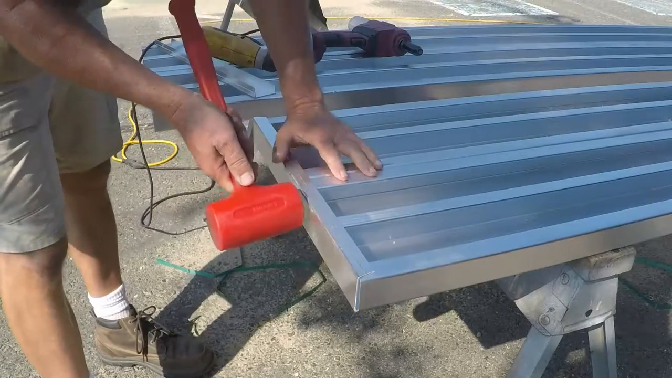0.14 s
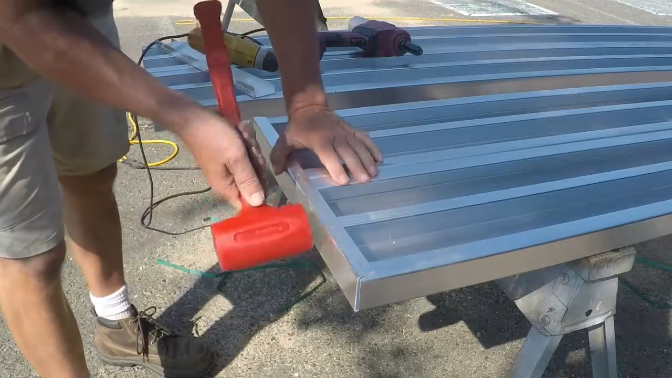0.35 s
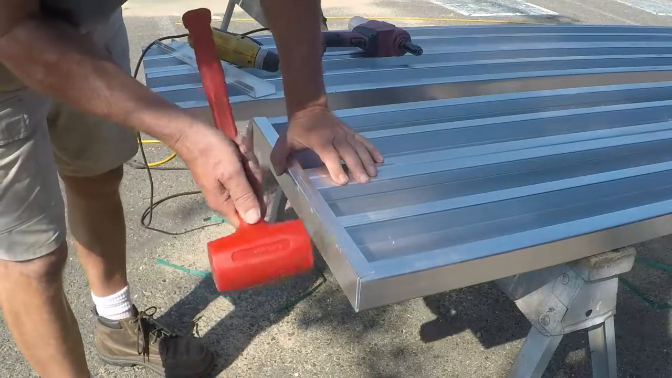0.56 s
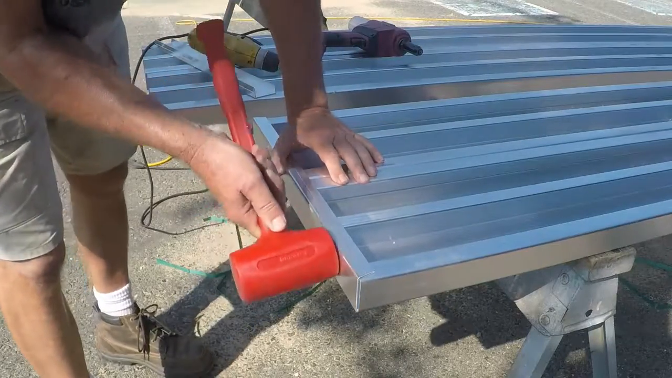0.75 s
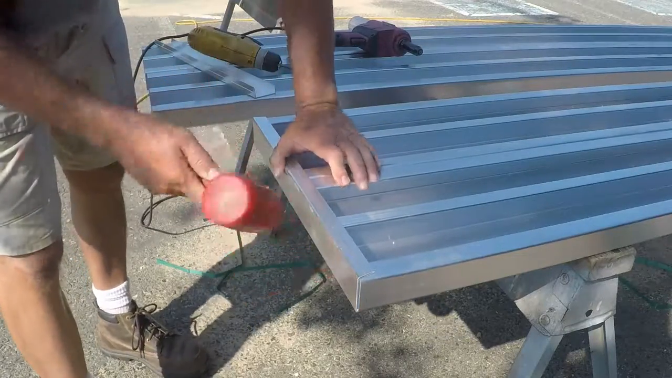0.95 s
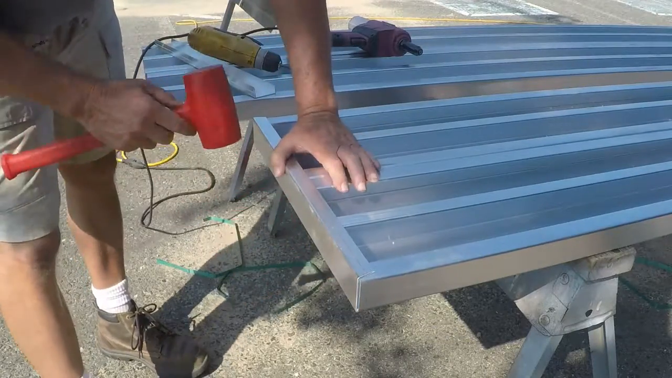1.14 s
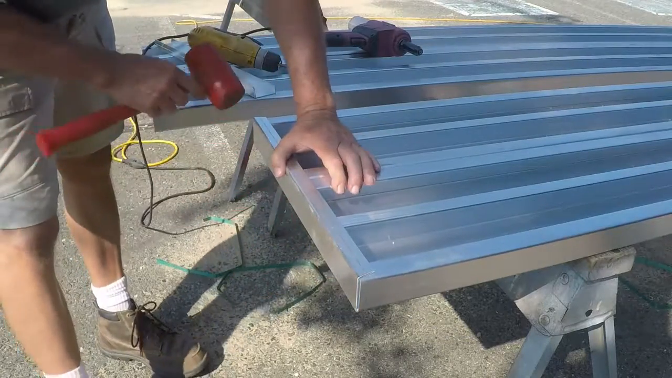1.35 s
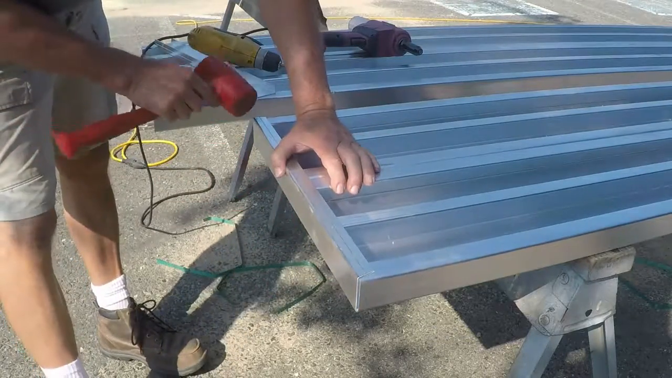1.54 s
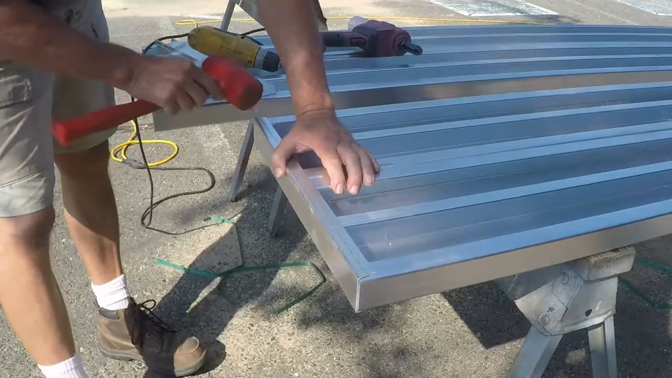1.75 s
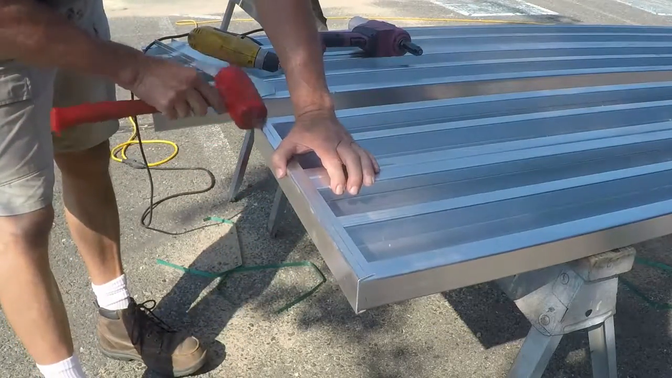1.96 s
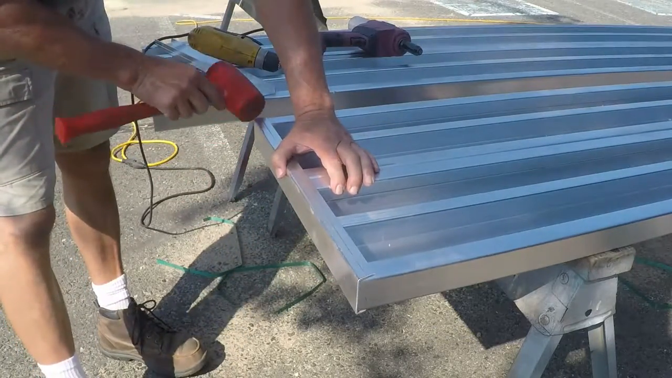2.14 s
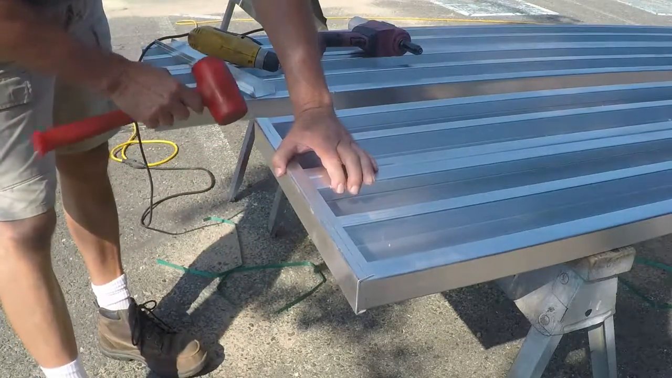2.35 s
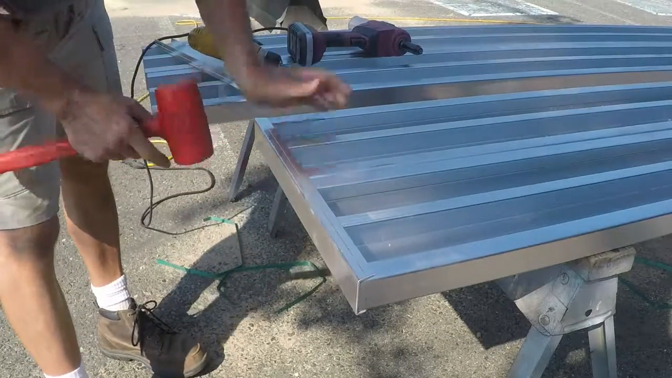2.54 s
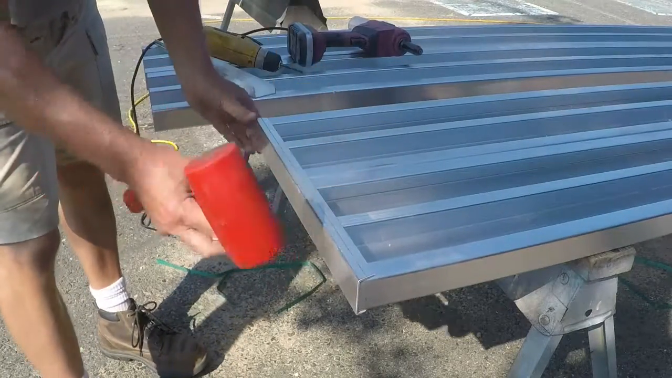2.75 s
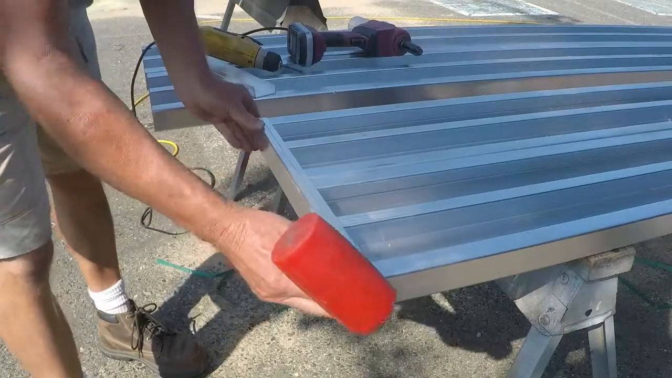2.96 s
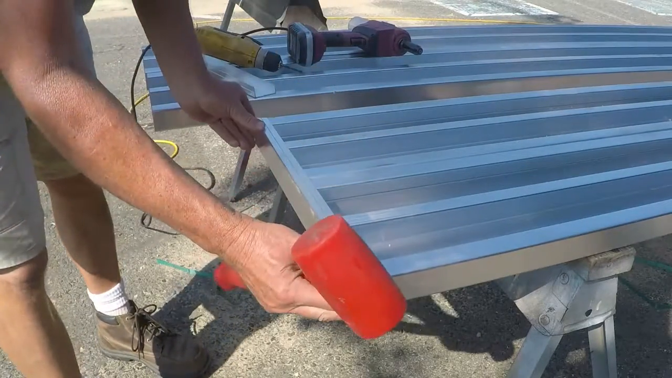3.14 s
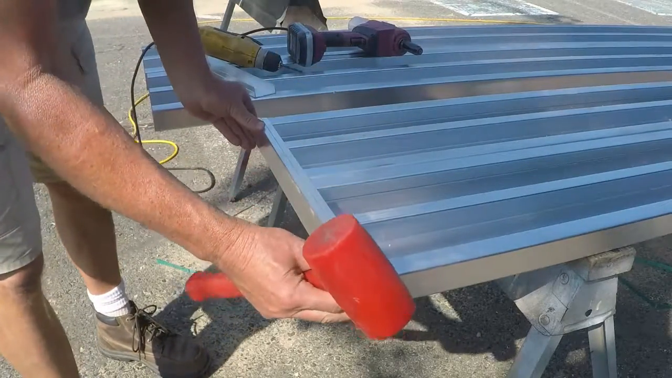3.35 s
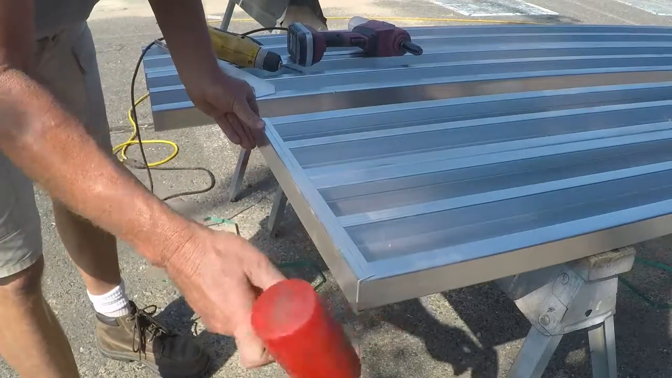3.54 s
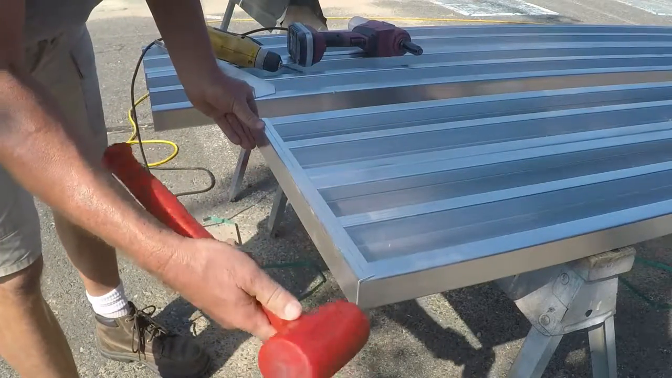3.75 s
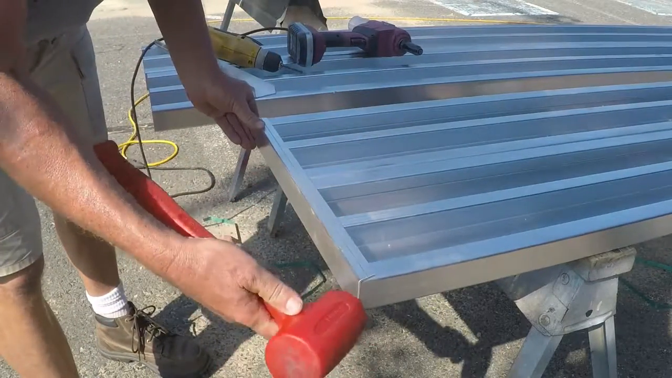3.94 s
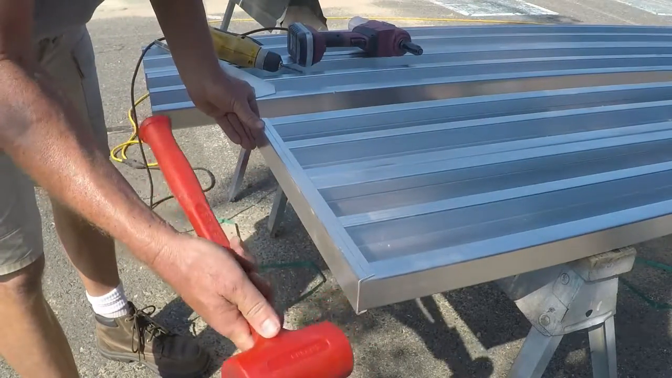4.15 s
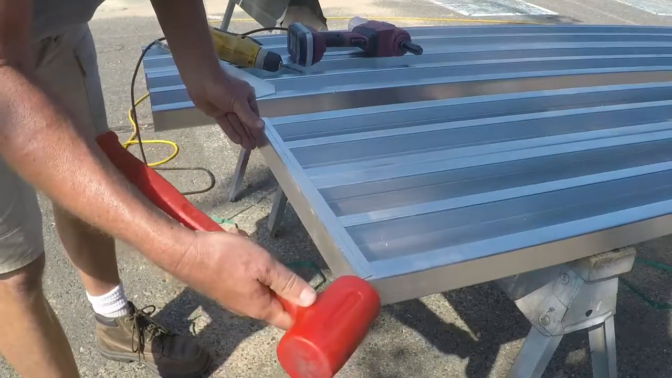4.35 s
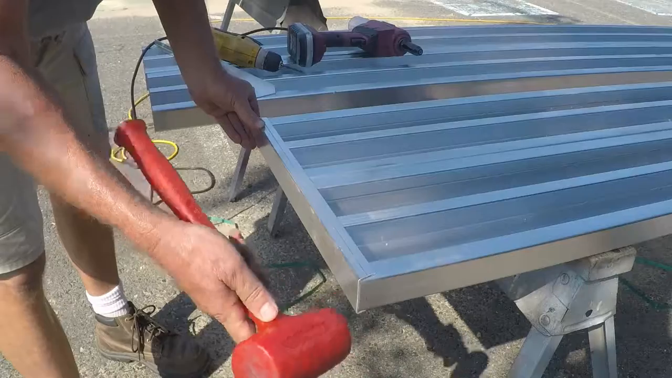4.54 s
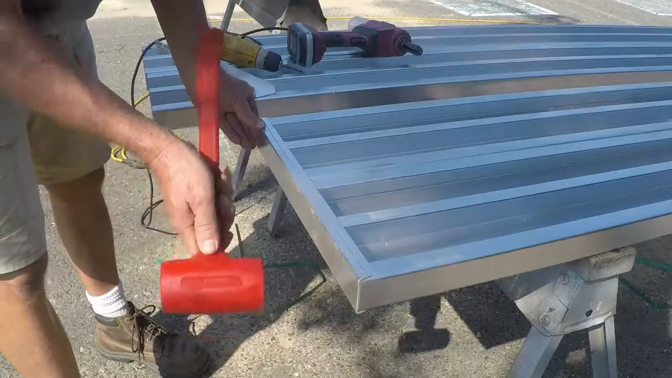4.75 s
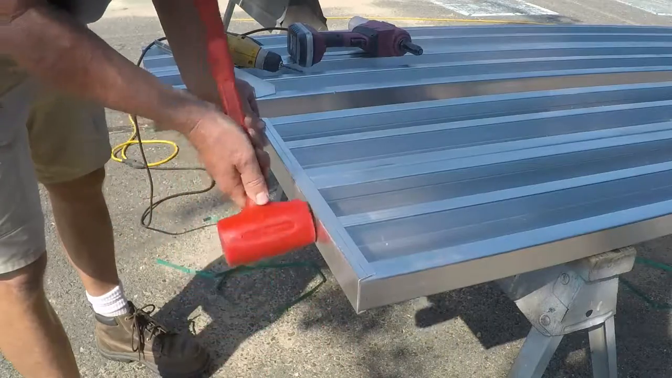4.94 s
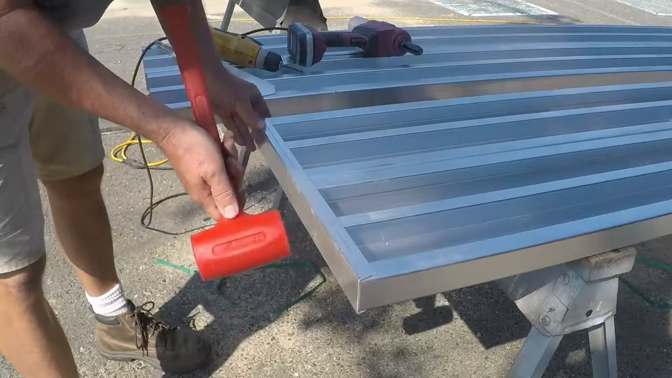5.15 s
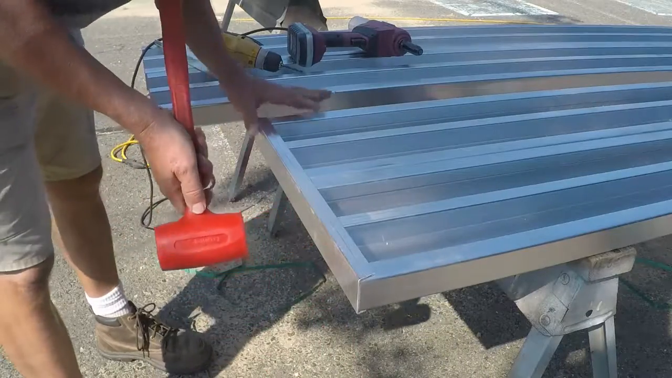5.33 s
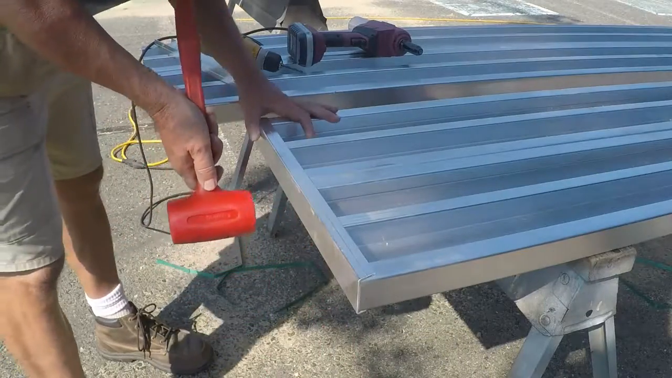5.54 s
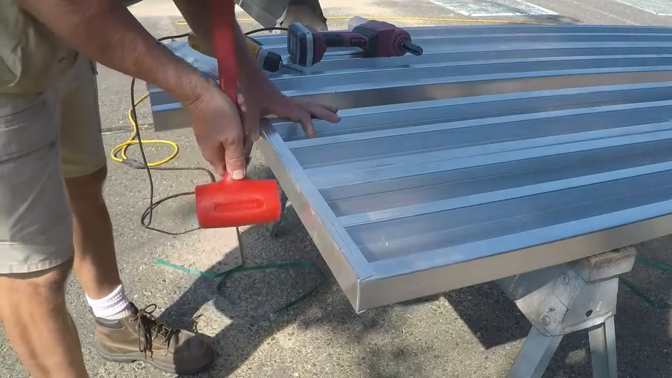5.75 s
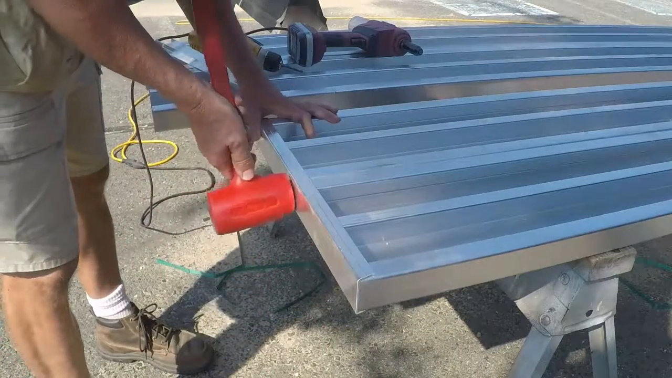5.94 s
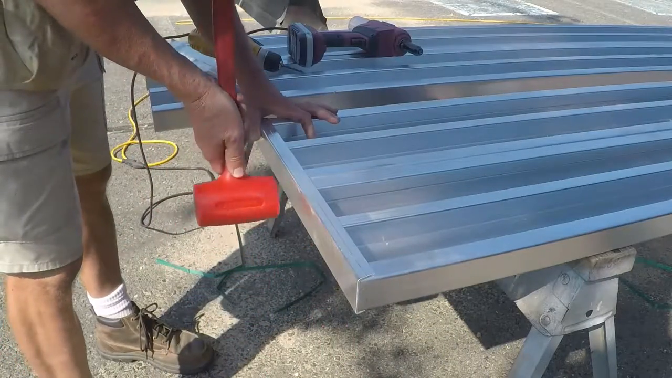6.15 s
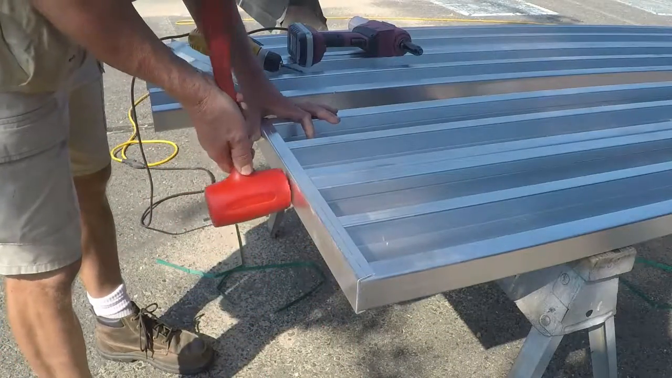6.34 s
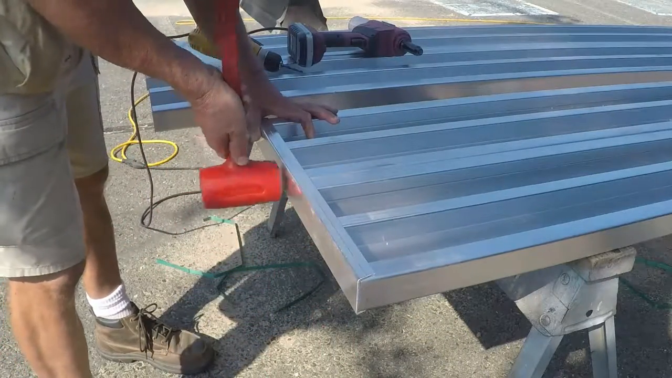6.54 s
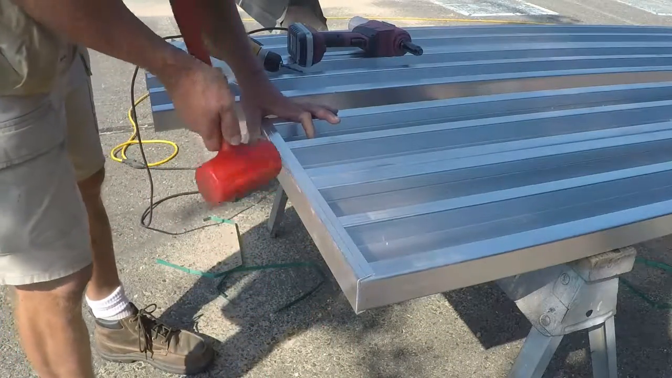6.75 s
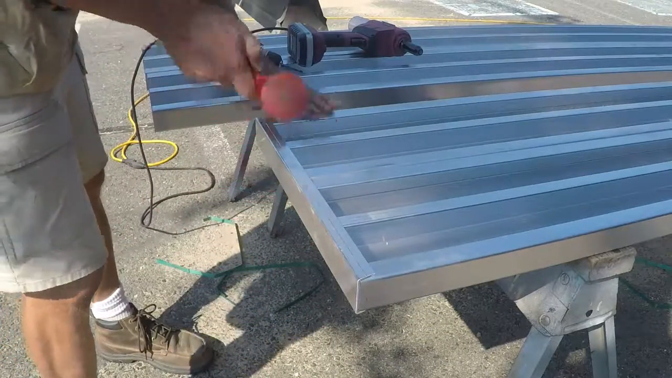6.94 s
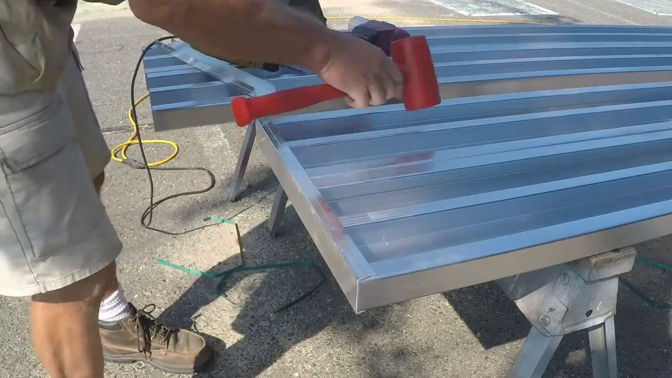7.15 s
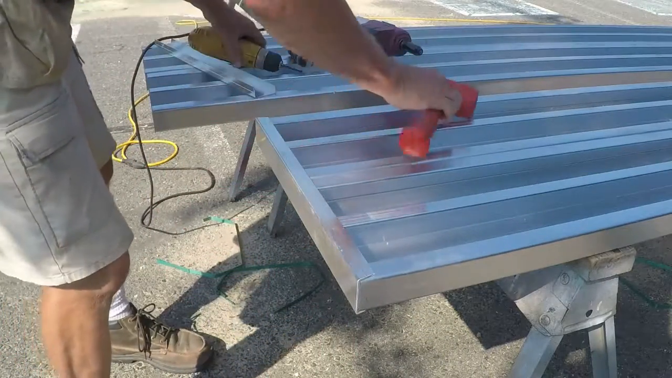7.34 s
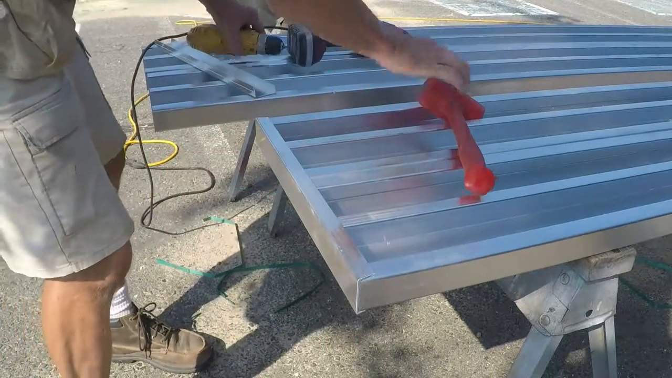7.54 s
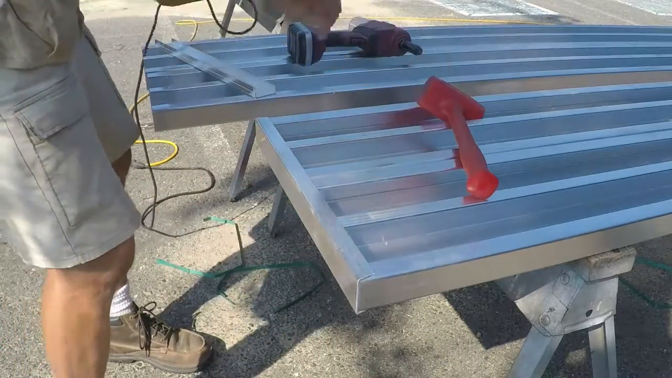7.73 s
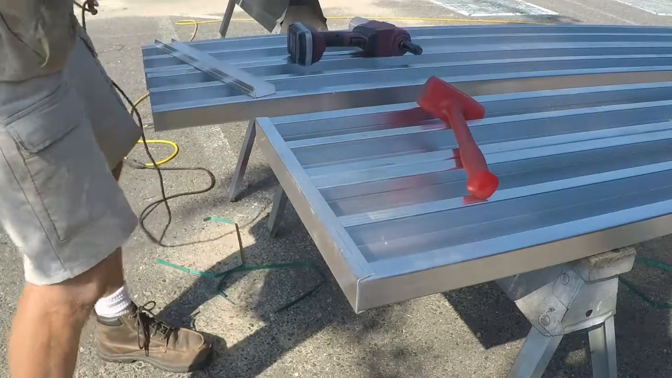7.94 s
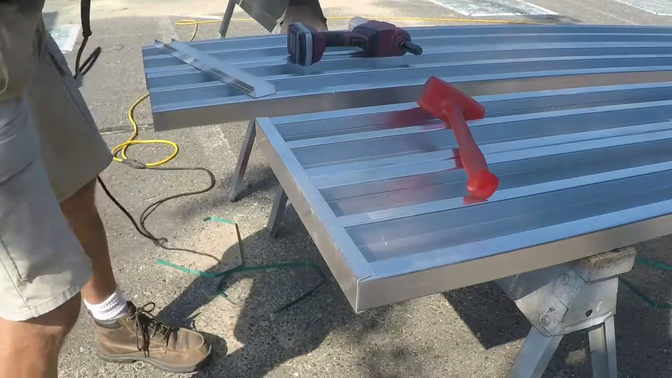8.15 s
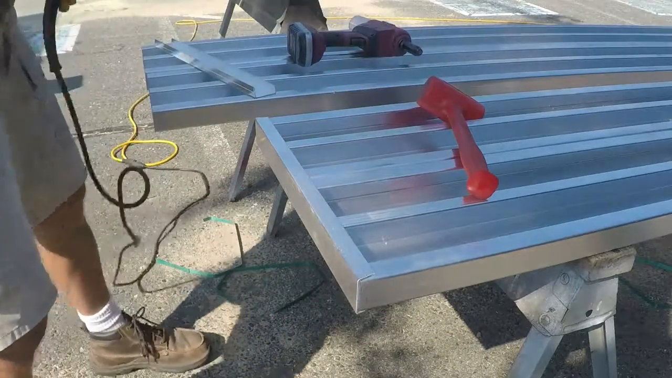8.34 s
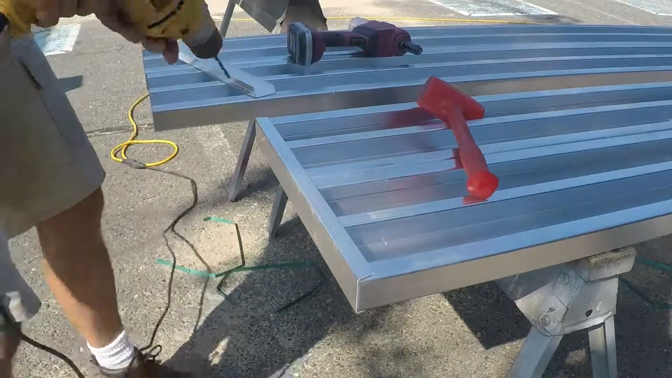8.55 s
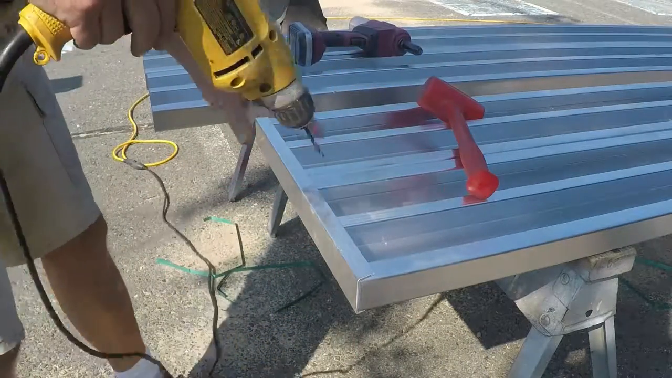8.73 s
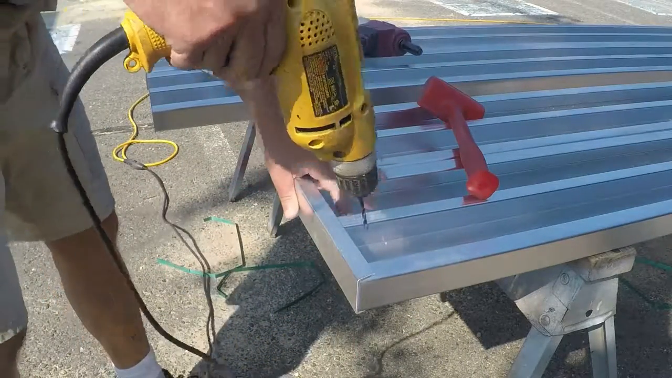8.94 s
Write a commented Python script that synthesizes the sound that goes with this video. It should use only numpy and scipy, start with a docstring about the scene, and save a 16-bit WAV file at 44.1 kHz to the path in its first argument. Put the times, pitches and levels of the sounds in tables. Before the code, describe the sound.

Outdoors, close to hollow aluminium planks resting on sawhorses, with low lumpy wind rumble and faint far hiss throughout. A mallet blow lands at once, followed by sharper, louder cracks at 0.4 and 0.7 s; each has a gritty shot-filled impact, a small low thump, a clangy midrange ring fading within half a second, and rattling of loose metal. From 1.2 to 3.5 s there are only soft brushes and muted knocks, at about 1.6, 1.9 and 2.2 s. A moderate knock at 3.8 leads to strong blows at 4.3, 4.95, 5.85 (the loudest crack), 6.2 and 6.6 s, with light metallic touches between. The mallet is set down on the metal with dull hollow clunks at 7.3 and 7.5 s. Faint scuffs follow; around 8.3 s a small steel part jingles quickly and brightly, then slight touches and quiet air until 9 s.

```python
"""Mallet blows on hollow metal planks

A shot-filled mallet knocks an aluminium end cap onto hollow aluminium planks lying on sawhorses, out of doors.
Each blow sums a noise crack, a two-mode thump of the sawhorses and a dense ring of decaying sheet modes.
Random tiny contacts make the loose planks chatter on, and soft noise touches brush the metal between blows.
Near the end a small steel part on a tool jingles; shaped noise gives wind rumble and a far hiss."""
import sys
import numpy as np
from scipy import signal
from scipy.fft import rfft, irfft, next_fast_len
from scipy.io import wavfile
from scipy.ndimage import uniform_filter1d, map_coordinates

SR = 44100
rng = np.random.default_rng(int(sys.argv[2]) if len(sys.argv) > 2 else 0)


def to_wav(sig):
    """Store sig (one row per channel, or 1-D mono) as 16-bit WAV at the path in sys.argv[1].

    Samples outside -1..1 are clipped; the rate is SR.
    """
    pcm = np.clip(np.atleast_2d(sig), -1, 1) * 32767
    pcm = np.round(pcm).astype(np.int16)
    wavfile.write(sys.argv[1], SR, pcm.T)  # frames by channels


N = 396459

# Mallet blows and knocks: start_s, crack_peak_db, ring_db (relative), thump_db (relative),
# ring_tilt_db_per_octave, decay_factor, ring_build_s, crack_pitch_hz, crack_brightness_db (relative),
# spot_hz (mode favoured by the struck spot), spot_boost_db, then the chatter of the loose planks:
# chatter_db, chatter_build_s, chatter_hold_s, chatter_fall_db_per_s, body_share_db
BLOW_EVENTS = [(0.0034, -19, -30, -46, 1.5, 1.48, 0.0096, 3100, -5, 900, 10.5, -35, 0.0061, 0.0027, 166, -4),
               (0.4205, -8.5, -28, -37.5, 0, 1.31, 0.013, 4200, -1, 366, 2, -31.5, 0.009, 0.016, 122, -10),
               (0.7263, -12.5, -28.5, -39, -4, 1.28, 0.0078, 4500, -2, 915, 1.5, -33, 0.0088, 0.016, 81, -6),
               (1.6427, -31.5, -32.5, -34.5, -3.5, 1.65, 0.0085, 3440, 1.5, 660, -3, -40.5, 0.022, .15, 185, -10.5),
               (1.912, -27.5, -28.5, -35.5, -3.5, 1.14, 0.0077, 890, 0.5, 660, 2, -39.5, 0.021, 0.16, 173, -6.5),
               (2.2188, -30.5, -30.5, -36.5, -3, 1.37, 0.0049, 1200, 3, 370, -2, -41.5, 0.007, .19, 121, -11),
               (3.8323, -23.5, -26.5, -34.5, -1.5, 1.3, 0.015, 2180, 1, 327, 8, -36, 0.0047, 0.16, 67, -7.5),
               (4.2867, -11, -24, -41, 1.5, 1.19, 0.0071, 3250, 2.5, 660, 0.5, -33, 0.0054, 0.0084, 68, -4),
               (4.9465, -7.5, -28.5, -42, 2.5, 1.44, 0.015, 4530, 3, 212, 8, -34, 0.016, 0.028, 118, -2),
               (5.841, -3.5, -32, -44.5, 1.4, 1.34, 0.019, 5040, 4.5, 388, 9, -33, 0.011, 0.018, 155, -8.5),
               (6.2336, -13.5, -31, -44.5, 0.5, 1.18, 0.027, 2310, -0.5, 395, 8, -35, .008, 0.015, 162, -3),
               (6.6049, -6.5, -31, -43, 2, 1.35, 0.015, 3100, 0, 1340, 6, -32, .008, 0.014, 143, -3),
               (7.3302, -31.5, -31, -42.5, -6.5, 0.76, 0.0022, 1190, 2, 210, 0, -37.5, 0.022, 0.067, 98, 0.5),
               (7.534, -25.5, -27.5, -32, -2, 1.22, 0.0017, 4360, 0, 660, 4.5, -38.5, 0.013, 0.14, 73, -2),
               (8.279, -48, -46, -62, -4.5, 1.47, 0.017, 2300, -1, 318, 19, -53.5, 0.011, .03, 84, 3)]
# Light touches and drags on the metal: start_s, touch_db (relative), then the chatter after each:
# chatter_db, chatter_hold_s, chatter_fall_db_per_s
TOUCH_EVENTS = [(0.205, -48, -55, .02, 200), (0.2623, -46, -57.5, .015, 110), (1.191, -44, -59, .01, 77),
                (1.421, -52, -62.5, .07, 202), (2.178, -41, -47.5, .03, 100),
                (2.504, -38.5, -44.5, .03, 150), (2.616, -60, -56.5, .03, 46),
                (2.782, -38.5, -58.5, .015, 98), (3.053, -45, -63, .02, 88), (3.426, -47, -66, .01, 60),
                (4.205, -49, -48, .015, 117), (4.572, -40, -47, .01, 132), (4.74, -55, -59.5, .03, 80),
                (4.8184, -49, -63.5, .015, 59.5), (5.229, -40, -63, .015, 39), (5.507, -57, -69, .1, 30),
                (5.78, -42, -71, .015, 299), (6.471, -39.5, -61, .035, 150),
                (7.143, -45.5, -70.5, .015, 50.5), (7.855, -58, -54, .1, 33), (7.996, -40, -54.5, .015, 40),
                (8.18, -50, -58, .01, 200), (8.501, -46, -63.5, .075, 219.5),
                (8.752, -47, -71.5, .008, 400)]
# Dense plank modes between the clusters: frequency_hz, density_db (per Hz)
SHEET_SPECTRUM = [(53, -40.5), (90, -3), (398, 1), (667, -5), (902, -4), (1760, -13), (2280, -6.5),
                  (2890, -14.5), (4700, -16), (5100, -28.5), (6000, -26), (6500, -32), (9500, -42),
                  (15500, -56.5)]


def amp(db):
    """Level: decibels to an amplitude ratio."""
    return 10 ** (np.asarray(db) / 20)


def unit(x):
    """Normalisation: scales a signal to rms 1."""
    return x / np.sqrt(np.mean(x ** 2) + 1e-20)


def along(points, hz):
    """Spectral envelope: interpolates (frequency, value) points on a log axis."""
    f, v = np.transpose(points)
    return np.interp(np.log(hz + 1), np.log(f + 1), v)


def wobble(rate):
    """Slow fluctuation: a smooth random curve with rate knots a second."""
    knots = rng.standard_normal(int(N * rate / SR) + 4)
    return map_coordinates(knots, [np.arange(N) * rate / SR])


def filtered(x, response):
    """Linear filtering: multiplies the spectrum of x by a response of frequency."""
    m = next_fast_len(len(x) + 4096)
    return irfft(rfft(x, m) * response(np.fft.rfftfreq(m, 1 / SR)), m)[:len(x)]


def add(out, s, sound):
    """Superposition: mixes a sound in at time s."""
    part = out[round(s * SR):][:len(sound)]
    part += sound[:len(part)]


def mallet():
    """Impact excitation: each blow gives a crack, a ring and a low damped thump of the sawhorses."""
    out, t = np.zeros(N), np.arange(SR // 2) / SR
    for blow in BLOW_EVENTS:
        s, crack_db, ring_db, thump_db, tilt_db, slow, rise, pitch_hz, bright_db, spot_hz, spot_db, *_ = blow
        blunt = 1 + amp(-.6 * (crack_db + 22.5))  # weak blows land blunter
        add(out, max(s - .002, 0), amp(crack_db) * crack(pitch_hz, bright_db, blunt))
        add(out, s, amp(ring_db - 3.5) * ring(tilt_db, slow, rise, spot_hz, spot_db))
        # the legs stand a little differently each time
        sway_hz, knock_hz = np.array([72, 175]) * rng.normal(1, 0.1, 2)
        sway = np.sin(2 * np.pi * sway_hz * t)
        knock = 0.97 * np.sin(2 * np.pi * knock_hz * t) * amp(-60 * t / .5)
        envelope = amp(thump_db - 60 * t / 0.66) * (1 - np.exp(-t / 0.0021))
        add(out, s, envelope * (sway + knock))
    return out


def crack(pitch_hz, bright_db, blunt):
    """Contact noise: the face touches, the shot inside lands 2 ms later, and the ground echoes it."""
    # Crack colour: frequency_hz, density_db (per Hz)
    crack_spectrum = [(150, -23), (700, -6), (2000, -6.5), (4500, -6), (8000, -14.5), (12000, -28.5),
                      (16000, -36)]
    t = np.arange(SR // 8) / SR

    def burst(s, t60):
        onset = 1 - np.exp(-np.maximum(t - s, 0) / (0.00042 * blunt))
        return onset * amp(-60 * np.abs(t - s) / (t60 * blunt))

    def colour(f):
        peak = 1 + 0.91 / (1 + ((f - pitch_hz) / 700) ** 2)
        return amp(along(crack_spectrum, f) + bright_db * np.log2(1 + f / 4000) * 2) * peak

    def clank(f):
        # the mode clusters, without the sheet response, colour the crack
        return colour(f) * plank(f, 9.2) / amp(along(SHEET_SPECTRUM, f))

    face, shot = 0.23 * burst(0, 0.0068), burst(.0021, 0.018)
    echo, tail = 0.24 * burst(0.0092, 0.0078), 0.14 * burst(0.0016, 0.13)
    sound = (face + shot + echo + tail) * filtered(rng.standard_normal(len(t)), clank)
    return sound / np.abs(sound).max()


def ring(tilt_db, slow, rise, spot_hz, spot_db):
    """High modal density: noise dying at its own speed in each band, plus the clear damped modes."""
    # Decay of the dense modes at decay factor 1: frequency_hz, t60_s
    dense_decay = [(100, 1), (260, 0.78), (700, 0.58), (1840, 0.78), (4850, .3), (12800, 0.147)]
    # Clear modes of cap and plank, decay at factor 1: frequency_hz, level_db (relative), t60_s
    clear_modes = [(206.8, -4, 0.68), (241.5, -0.5, 0.55), (292, -9.5, 1), (326.2, -6.5, 0.66),
                   (377.6, -13, 0.53), (401.5, -7, 0.98), (609, -6.5, 0.69), (648.4, 2, 0.54),
                   (683, -3.5, 0.87), (893, -6.5, 0.24), (895, -1, .45), (1210, -11, 0.48), (1286, -8.5, 1),
                   (1363, -6.5, 0.86), (1440, -18.5, 1), (1700, -18, 1), (2230, -16, 0.45),
                   (2390, -16.5, 0.22), (2274, -15, .8), (2335, -2, 0.55), (2605, -22, 0.68),
                   (2770, -13.5, 0.424), (3130, -5, 0.35), (3820, -7.5, 0.22), (4270, -6, 0.15),
                   (5440, -23, .4)]
    t = np.arange(SR * 2 // 3) / SR

    def spot(f, width):
        return spot_db / (1 + (np.log(f / spot_hz + 0.00103) / width) ** 2)

    def colour(f):
        return plank(f, 10.0) * amp(tilt_db * np.log2(f / 1000 + .05) + 0.29 * spot(f, 0.11))

    noise = unit(filtered(rng.standard_normal(len(t)), colour))
    hz, frames, z = signal.stft(noise, SR, nperseg=256)
    decay = amp(-60 * frames / (slow * along(dense_decay, hz)[:, None]))
    dense = signal.istft(z * decay, SR, nperseg=256)[1][:len(t)]

    f, db, t60 = np.transpose(clear_modes)[:, :, None]
    coarse = t[::25]  # slow changes need few points
    steps = rng.standard_normal((len(f), len(coarse)))
    # neighbouring modes blur each line's phase
    drift = .13 * (f / 1000) ** .3 * np.cumsum(steps, axis=1)
    # each line beats like a close pair
    beats = 1 + 0.38 * np.sin(2 * np.pi * (rng.uniform(4.7, 16, f.shape) * coarse + rng.random(f.shape)))
    tilted_db = db + 1.2 * tilt_db * np.log2(np.maximum(f, 800) / 1000)
    start_db = tilted_db + spot(f, 0.087) + rng.normal(0, 3.4, f.shape)
    size = beats * amp(start_db - 60 * coarse / (slow * t60))
    phase = 2 * np.pi * (f * t + rng.random(f.shape)) + drift.repeat(25, axis=1)[:, :len(t)]
    waves = np.sin((phase % (2 * np.pi)).astype(np.float32))
    clear = np.sum(size.repeat(25, axis=1)[:, :len(t)] * waves, axis=0)

    build = 1 - np.exp(-t / max(rise, 1e-3))  # energy spreads along the plank
    fade = np.minimum(1, (t[-1] - t) / 0.069)
    return (dense + amp(-9) * clear) * build * fade


def plank(hz, cluster_db):
    """Resonance: gain of mode clusters standing in power on the broad sheet response."""
    # Clusters of plank modes: frequency_hz, width_hz, level_db (relative, compressed below)
    clusters = [(376, 69, -18.5), (633, 126, -0.5), (928, 19, 10.5), (1215, 267, -3), (1651, 51, -13.5),
                (2261, 74, -19), (2620, 9.64, -9), (3175, 44, -11), (3720, 26, -11), (4203, 350, -19.5),
                (5440, 460, -21), (6600, 47, -28.5), (6900, 45, -23), (7630, 57, -34.5), (9160, 550, -24.5)]
    bumps = sum(amp(2 * (cluster_db + 0.19 * db)) / (1 + ((hz - c) / (w / 2)) ** 2) for c, w, db in clusters)
    return amp(along(SHEET_SPECTRUM, hz)) * np.sqrt(1 + bumps)


def chatter():
    """Random-contact excitation: dense tiny hits of uneven size drive the plank, mostly its upper modes."""
    rest_db, rest_body_db = -75.5, -2  # faint chatter that never stops, and its body share
    touch_build_s, touch_body_db = 0.007, -5
    body_lingers = 0.68  # the body's fall rate over that of the upper modes
    bouts = [(blow[0], *blow[-5:]) for blow in BLOW_EVENTS]
    bouts += [(s, db, touch_build_s, hold, fall, touch_body_db) for s, _, db, hold, fall in TOUCH_EVENTS]
    power, body_power = amp(2 * rest_db), amp(2 * (rest_db + rest_body_db))
    for s, db, rise, hold, fall, share_db in bouts:
        power = power + shaking(s, db, rise, hold, fall)
        body_power = body_power + shaking(s, db + share_db, rise, hold, fall * body_lingers)
    level, body_level = np.sqrt(power), np.sqrt(body_power)

    def upper_modes(f):
        highpass = (f / 1700) ** 3 / (1 + (f / 1700) ** 3)
        return plank(f, 9.9) * highpass * amp(-.3 * np.log2(f / 3000 + 0.059))

    def body_modes(f):
        return plank(f, 7.7) / (1 + (f / 1500) ** 3)

    def grit_modes(f):
        return plank(f, 13.7) * (f / 6000) ** 4 / (1 + (f / 6000) ** 3)

    contacts = unit((rng.random(N) < 3000 / SR) * rng.standard_normal(N))  # 3000 a second on average
    drive = (contacts + 1.56 * rng.standard_normal(N)) * amp(1.1 * wobble(35) + 1.3 * wobble(13))
    upper = unit(filtered(drive, upper_modes))
    body = unit(filtered(drive, body_modes))
    clumped = contacts * amp(5.7 * wobble(76))  # the sharpest contacts come in clumps
    grit = unit(filtered(clumped, grit_modes))
    bright = amp(-14.5) * (level / amp(-34.5)) ** 1.23  # harder chatter is brighter
    return level * (upper + bright * grit) + body_level * body


def shaking(s, db, rise, hold, fall):
    """Energy decay: power of a bout of chatter that builds up, holds, falls, then settles slowly."""
    settle_db, settle_db_per_s = -20, 41.5  # the slow part: start relative to the bout's level, fall
    t = np.maximum(np.arange(N) / SR - s, 0)
    after = np.maximum(t - hold, 0)
    build = (amp(db) * (1 - np.exp(-t / max(rise, 1e-3)))) ** 2
    return build * (amp(-2 * fall * after) + amp(2 * (settle_db - settle_db_per_s * t)))


def taps():
    """Friction noise: soft short brushes on the metal, coloured by the plank."""
    out, t = np.zeros(N), np.arange(SR // 8) / SR
    for s, db, *_ in TOUCH_EVENTS:
        noise = unit(filtered(rng.standard_normal(len(t)), lambda f: plank(f, 2.3) * (f / 3000) ** 1.05))
        add(out, s, amp(db - 10 - 60 * t / 0.0847) * (1 - np.exp(-t / 0.0027)) * noise)
    return out


def jingle():
    """Modal synthesis: each contact rings the small steel part's damped modes at new strengths."""
    # Contacts of the part on the tool: start_s, level_db (relative)
    contacts = [(8.2833, -53), (8.2985, -38.5), (8.311, -42.5), (8.3294, -48)]
    # Modes of the part: frequency_hz, level_db (relative), t60_s
    steel_modes = [(3540, 0, .04), (4200, -12, 0.035), (5050, 4, .06), (6100, 0, 0.066), (6800, -1, 0.055),
                   (7800, -7, .06), (9400, -6, 0.044)]
    out, t = np.zeros(N), np.arange(SR // 6) / SR
    f, level_db, t60 = np.transpose(steel_modes)[:, :, None]
    for s, db in contacts:
        size = amp(level_db + rng.normal(0, 3.6, f.shape) - 60 * t / t60)
        modes = size * np.sin(2 * np.pi * f * rng.normal(1, 0.0077, f.shape) * t)
        # the part is loose and buzzes
        rub = 1 + 1.4 * uniform_filter1d(rng.standard_normal(len(t)), size=5)
        add(out, s, amp(db - 14.5) * (1 - np.exp(-t / .001)) * rub * modes.sum(axis=0))
    return out


def air():
    """Turbulence noise: lumpy wind rumble on the microphone and a smooth far hiss."""
    # Wind rumble level: time_s, level_db
    wind_level = [(0.0, -44), (0.68, -48), (0.8, -50), (1.15, -48.5), (2.07, -47.5), (2.98, -47.5),
                  (3.85, -48), (4.08, -45.5), (5.26, -47), (5.41, -47), (6.13, -50), (6.43, -49.5),
                  (7.11, -50), (7.36, -51), (7.56, -47), (7.96, -51.5), (8.74, -46), (8.99, -49)]
    # Rumble colour: frequency_hz, density_db (per Hz)
    rumble_spectrum = [(8.8, -31), (15, 0.5), (51, -1), (106, -9), (130, -15.5), (177, -20.5), (217, -48.5),
                       (300, -32.5), (390, -57), (660, -120)]
    # Hiss colour: frequency_hz, density_db (per Hz)
    hiss_spectrum = [(120, -33), (200, 2), (653, -4.5), (769, -16), (1260, -7), (1510, -13.5),
                     (2290, -10.5), (2700, -14), (4180, -16.5), (13400, -24.5), (15500, -27)]
    rumble_db = np.interp(np.arange(N) / SR, *np.transpose(wind_level))
    lumps = amp(1.2 * wobble(7))
    rumble = unit(lumps * filtered(rng.standard_normal(N), lambda f: amp(along(rumble_spectrum, f))))
    hiss = unit(filtered(rng.standard_normal(N), lambda f: amp(along(hiss_spectrum, f))))
    hiss_db = -62.5 + 0.32 * wobble(4.4)
    return amp(rumble_db) * rumble + amp(hiss_db) * hiss


def scene():
    """Superposition: all sources sum at a single microphone."""
    return (mallet() + chatter() + taps() + jingle() + air())[None]


def record(dry):
    """Band limiting: nothing from 15500 Hz upward is kept."""
    return filtered(dry[0], lambda hz: hz < 15500)[None]


dry = scene()
out = record(dry)
to_wav(out)
```